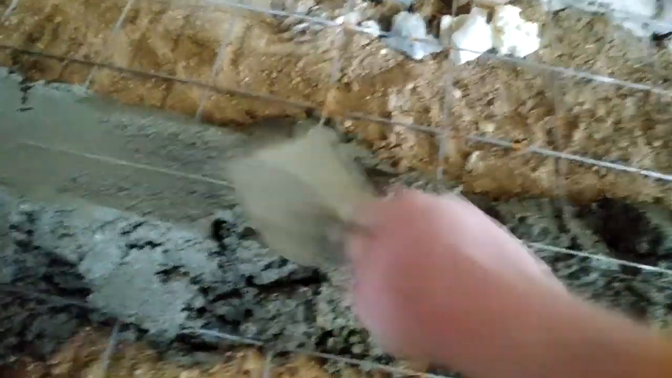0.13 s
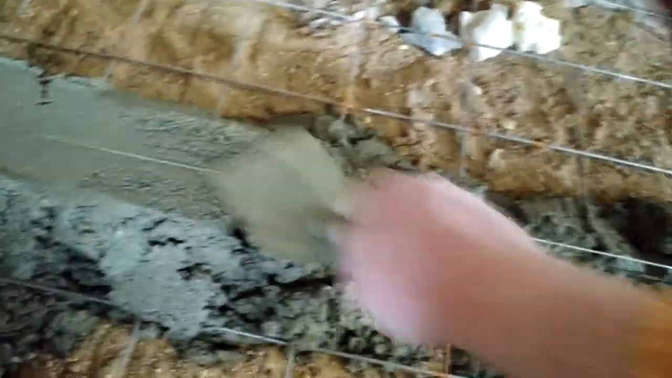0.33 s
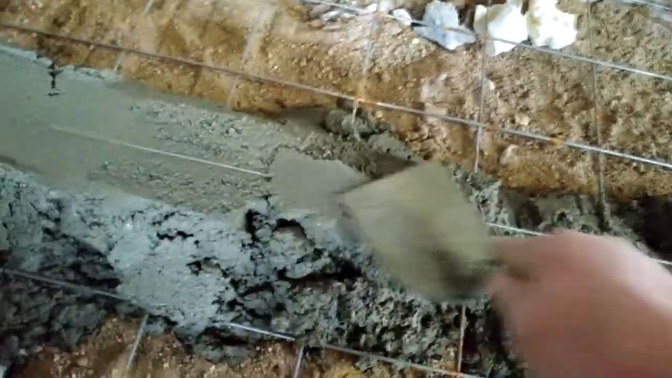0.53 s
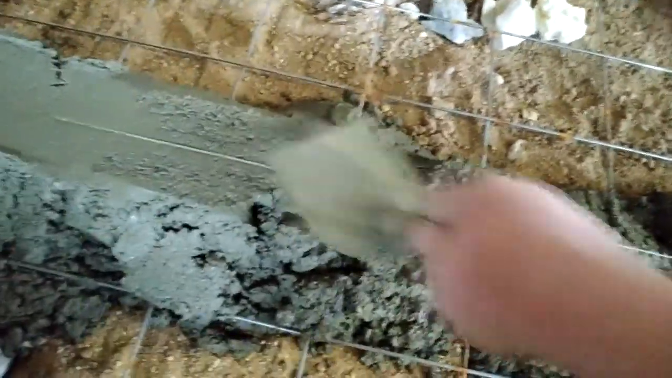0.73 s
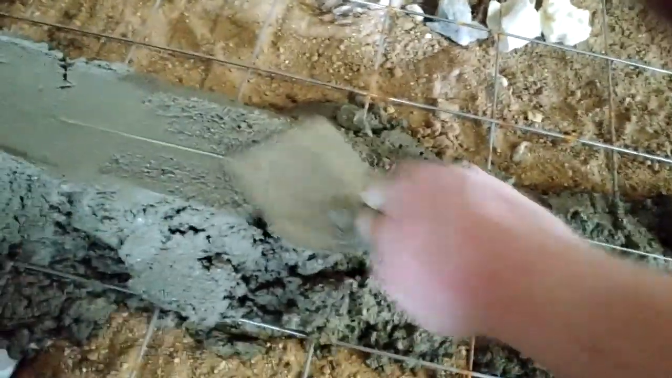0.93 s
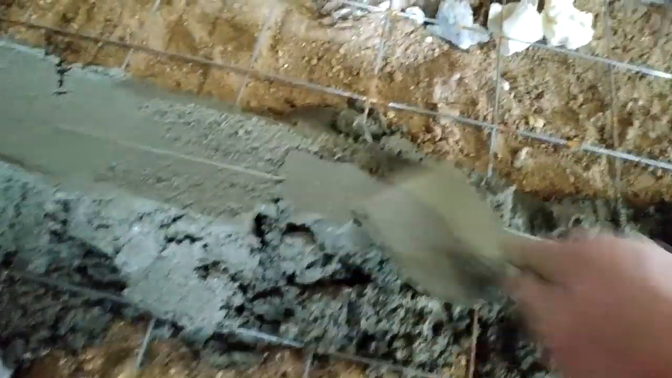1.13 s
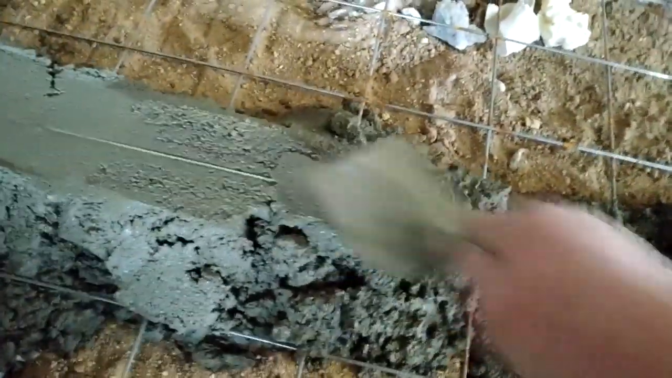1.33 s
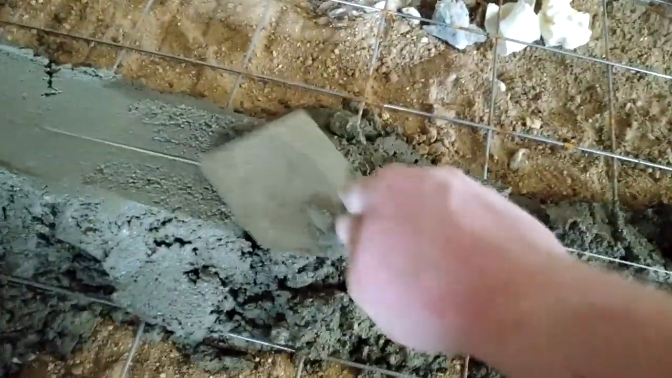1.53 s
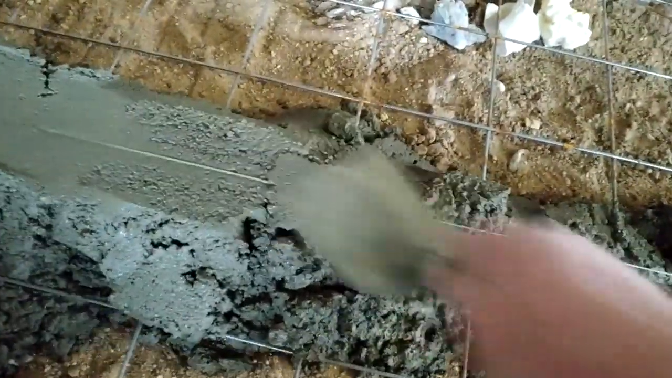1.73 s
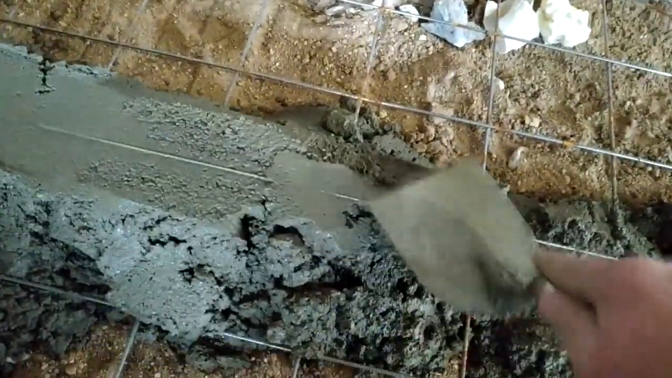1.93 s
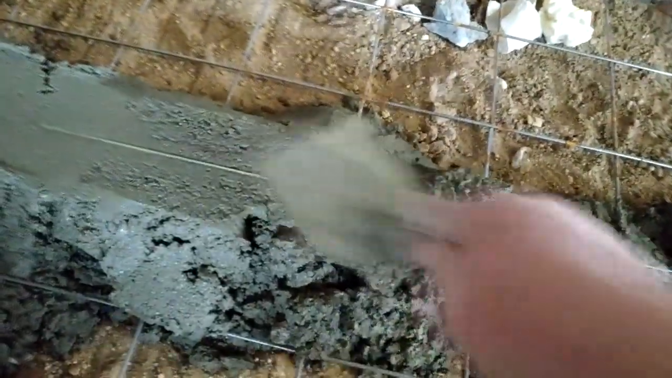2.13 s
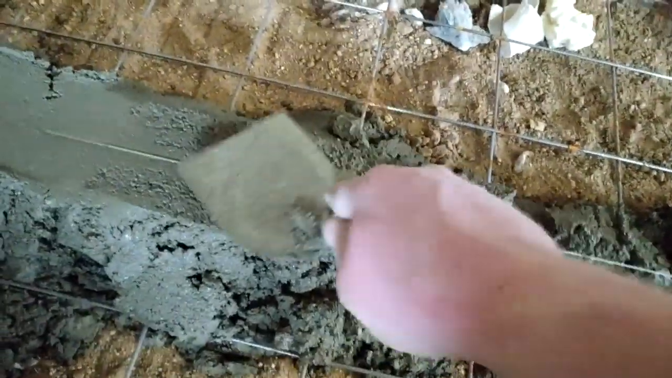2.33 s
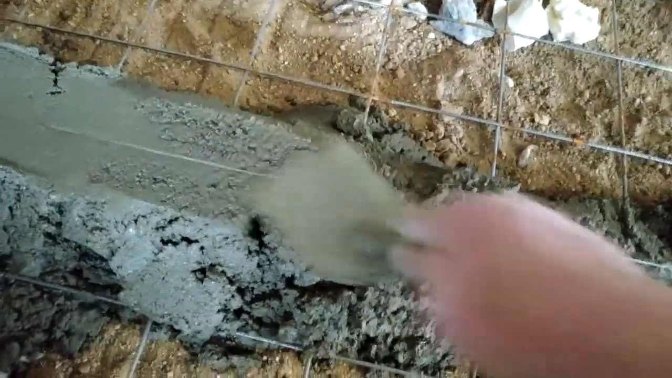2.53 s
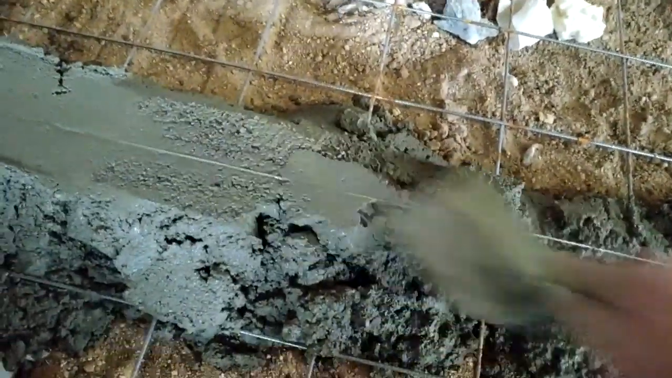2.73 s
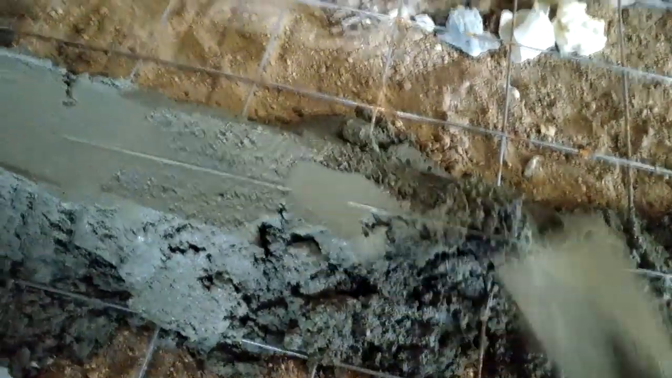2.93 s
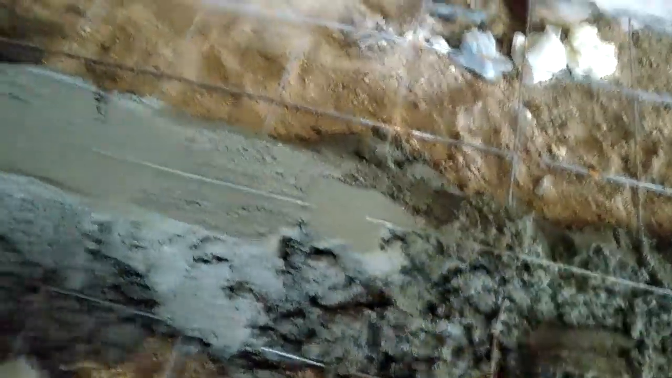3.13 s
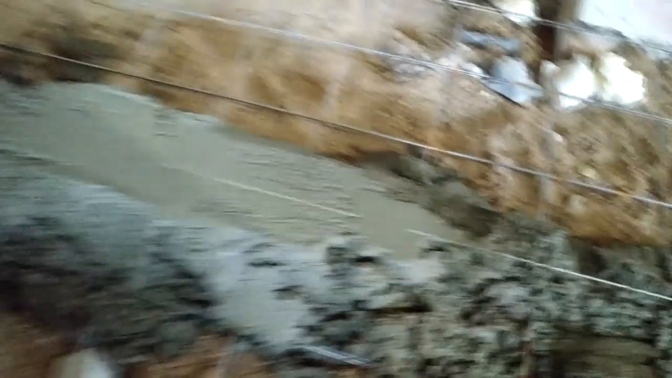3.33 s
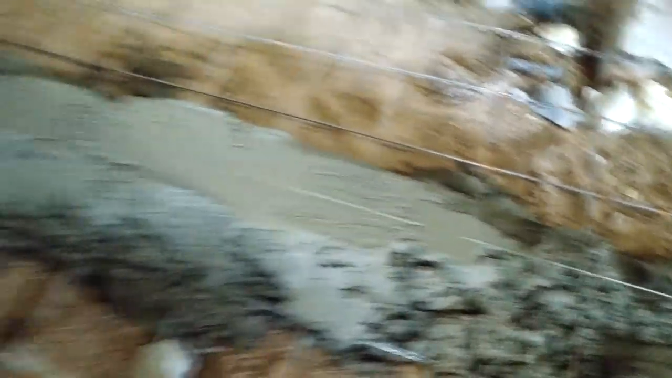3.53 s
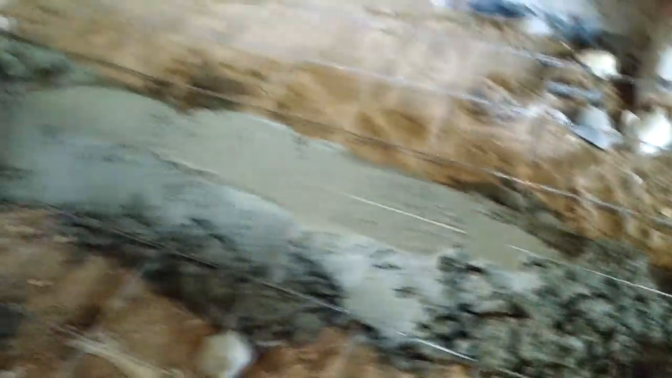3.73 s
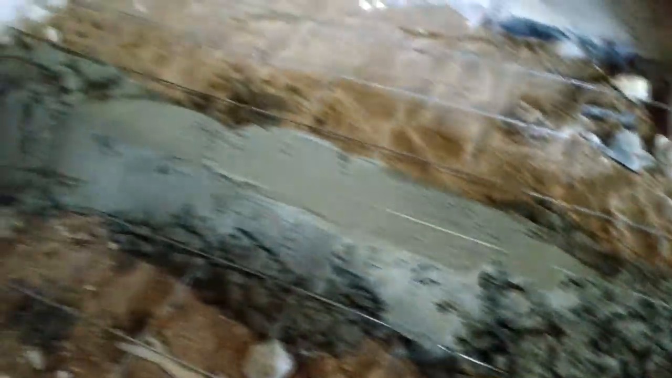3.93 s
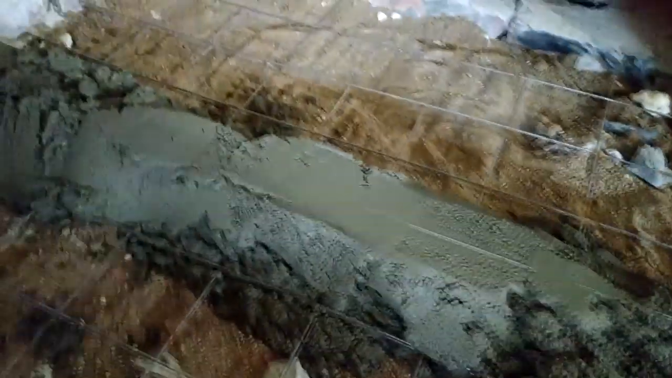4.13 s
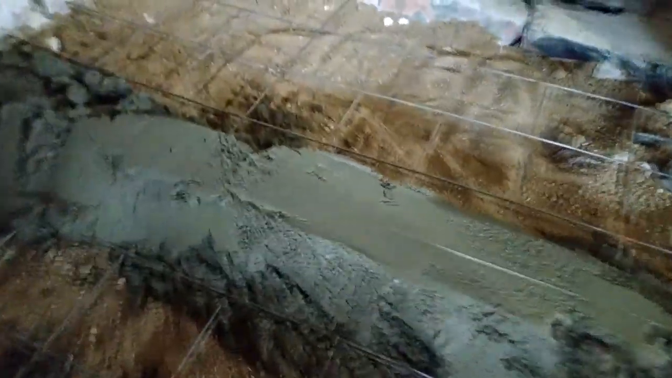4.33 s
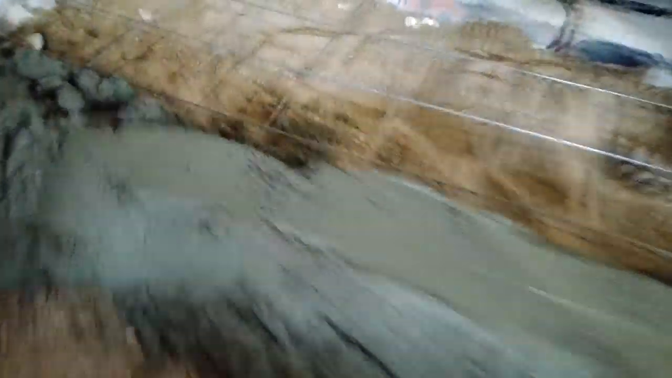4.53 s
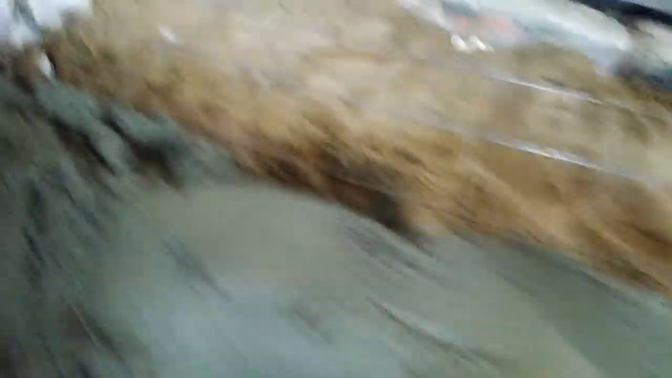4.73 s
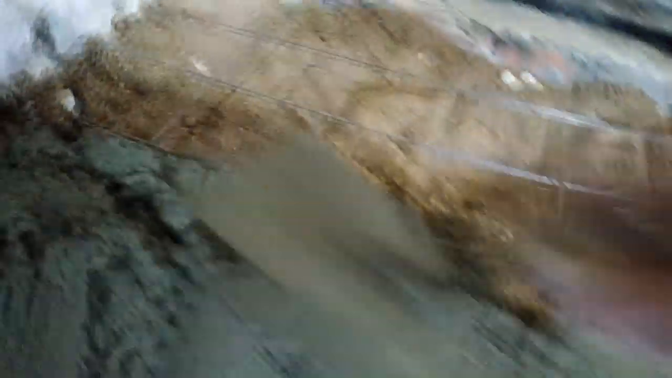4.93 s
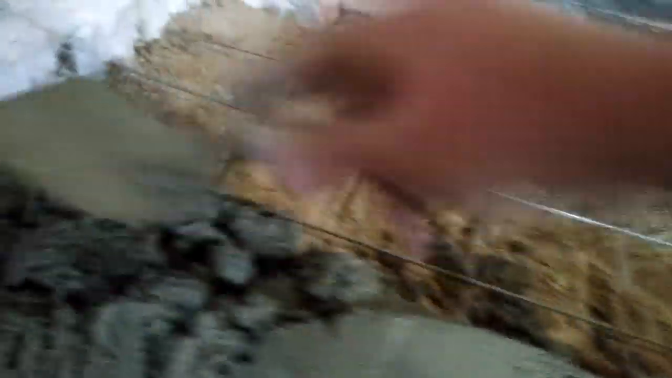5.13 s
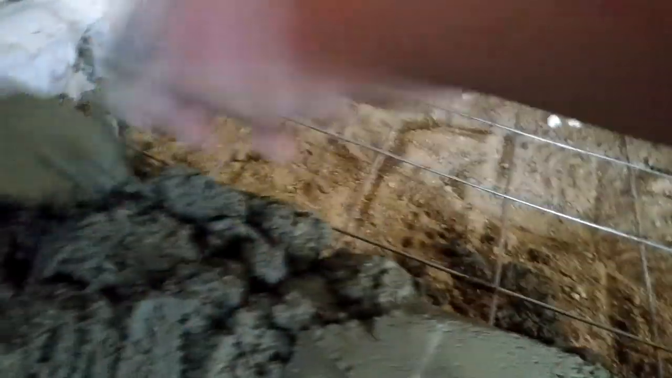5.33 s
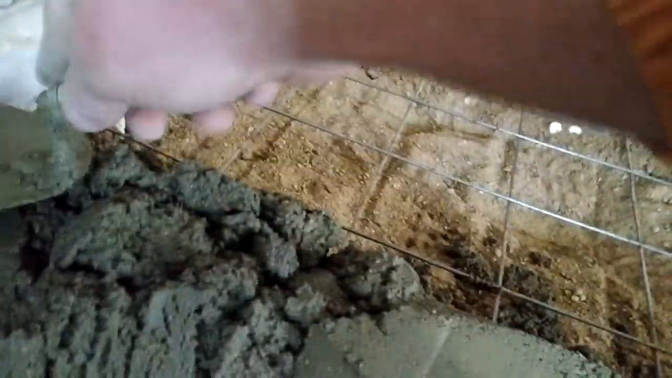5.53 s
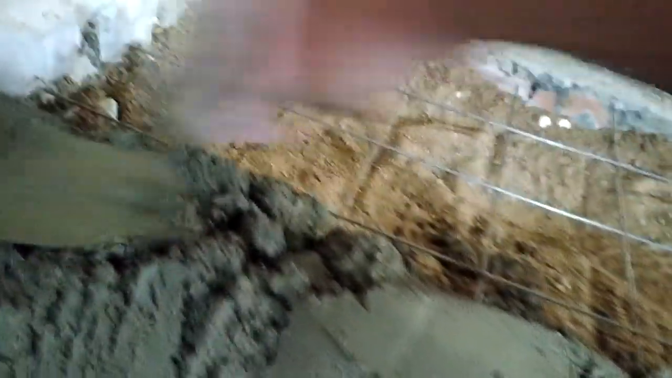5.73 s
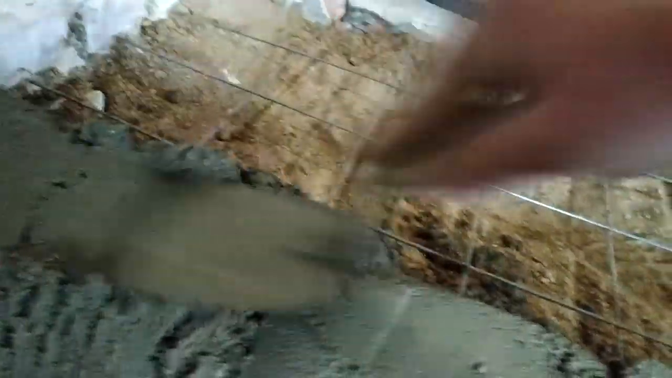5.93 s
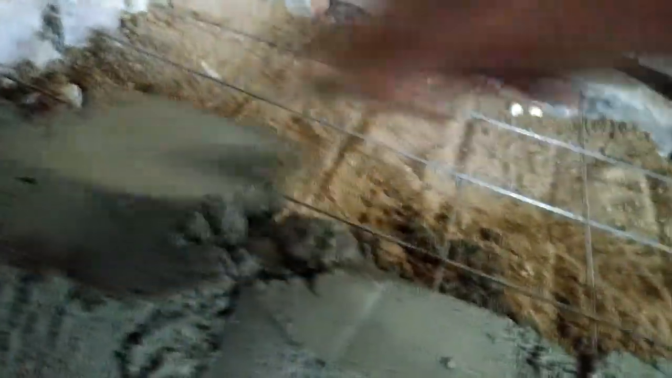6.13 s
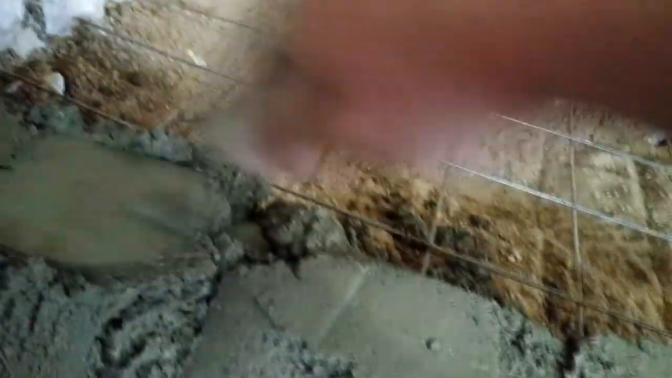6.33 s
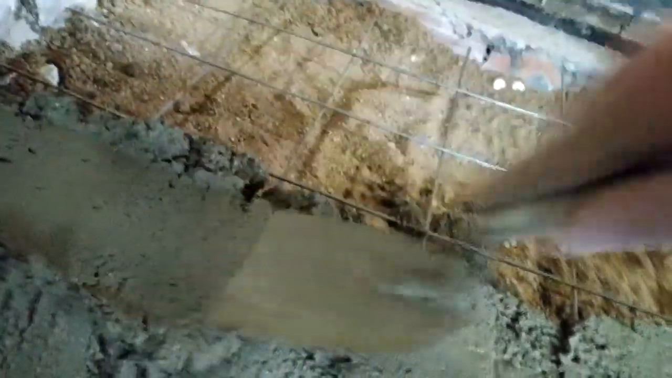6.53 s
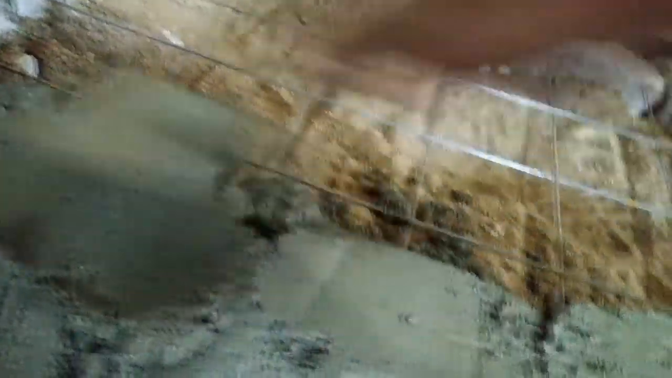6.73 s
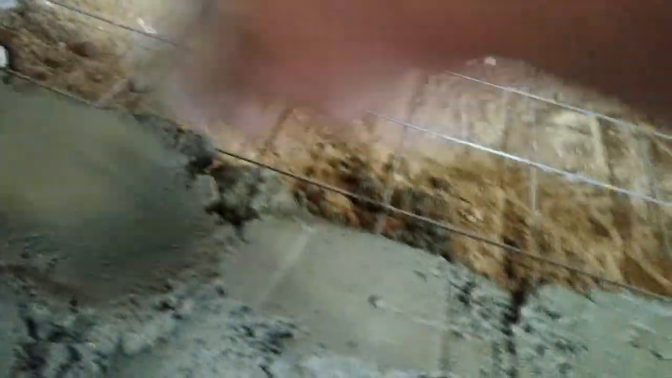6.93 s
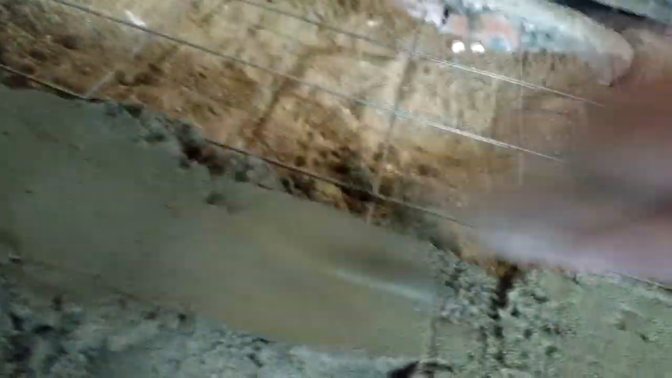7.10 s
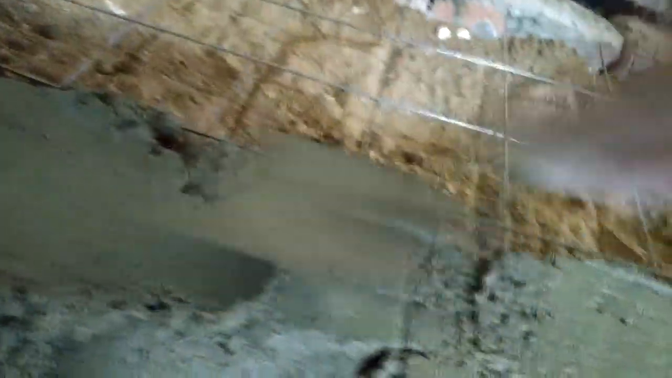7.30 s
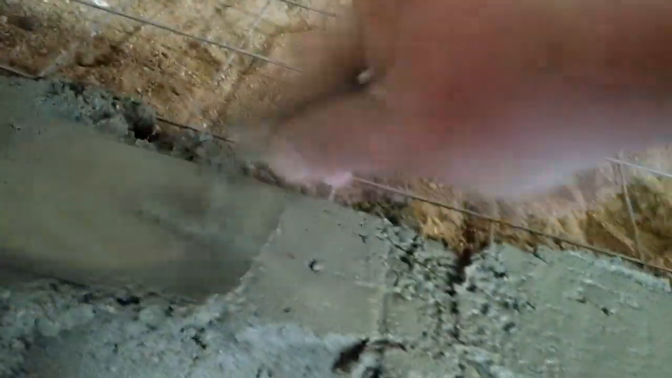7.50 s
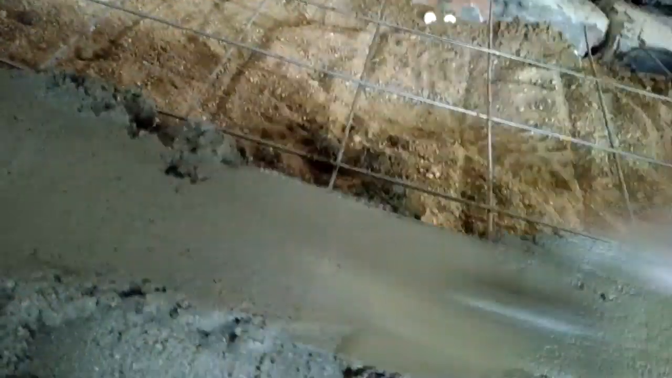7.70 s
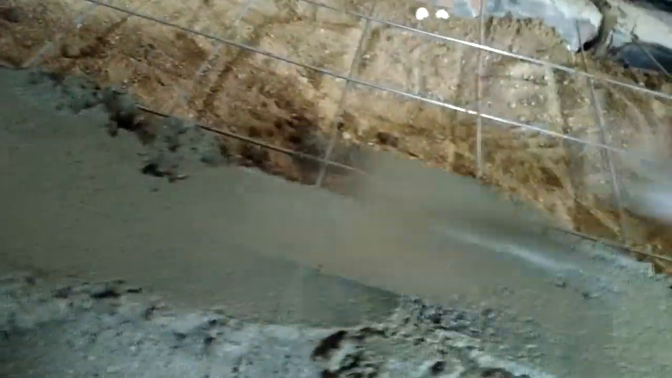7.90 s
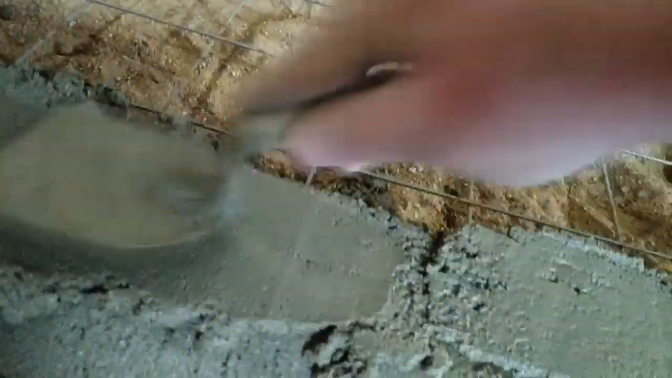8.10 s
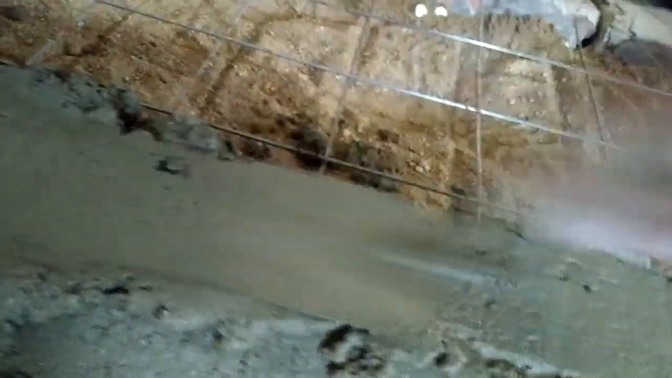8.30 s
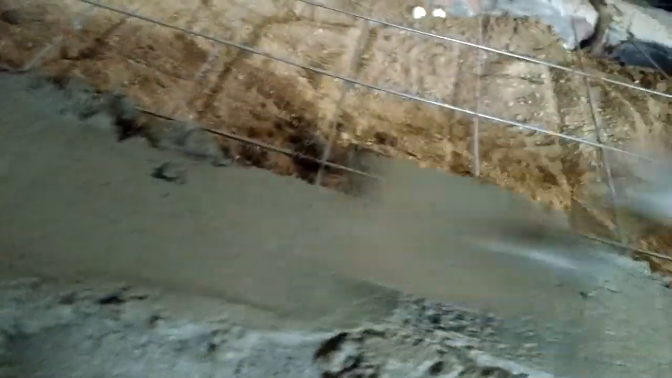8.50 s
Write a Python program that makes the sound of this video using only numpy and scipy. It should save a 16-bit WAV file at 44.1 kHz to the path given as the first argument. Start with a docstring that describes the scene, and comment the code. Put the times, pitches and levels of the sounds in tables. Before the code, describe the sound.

Gritty, chattering trowel scrapes on cement indoors, then shuffling knocks as the rumble fades, and five soft, even hissing passes in near quiet.

```python
"""A dull background rumble comes first; then a steel trowel smooths a strip of cement screed on a floor indoors.
Four firm strokes, some in several pushes, grind on sandy mortar and make the blade chatter.
The worker shifts along with rustles and bumps; the background dies down and five lighter strokes
hiss over wetter mortar. Random grain slips feed every scrape and rustle; resonances make the steel
and the knocks, and filtered noise makes the background."""
import sys
import numpy as np
from scipy import signal
from scipy.fft import rfft, irfft, next_fast_len
from scipy.io import wavfile
from scipy.ndimage import map_coordinates

SR = 44100
rng = np.random.default_rng(int(sys.argv[2]) if len(sys.argv) > 2 else 0)


def int16_out(signal):
    """Quantize to a 16-bit WAV file."""
    q = np.round(np.clip(np.atleast_2d(signal).T, -1, 1) * 32767)
    wavfile.write(sys.argv[1], SR, q.astype(np.int16))


N = 377496
TIME = np.arange(N) / SR   # seconds

# Firm pushes on sandy mortar. Each row: start in seconds, length in seconds, attack in seconds,
# landing in dB, sand hiss in dB, rise of the hiss over the push in dB, edge ring in dB,
# blade chatter in dB, edge pitch at the start in Hz (before its wobble).
FIRM_PUSHES = [(0.31, .18, 0.042, -32.5, -24.5, -2.5, -35, -36, 4580),
               (0.856, 0.024, 0.0077, -45.5, -32.5, -2, -34.5, -47.5, 3630),
               (0.885, 0.19, 0.0073, -44, -28, 5.5, -43, -40.5, 4860),
               (1.094, 0.022, 0.0089, -51.5, -29.5, 3, -37.5, -33, 3200),
               (1.583, 0.089, 0.001, -31, -25.5, -1, -34.5, -47.5, 4280),
               (1.674, 0.16, 0.0099, -63, -28, 2, -39, -35, 4040),
               (2.41, 0.11, 0.0016, -21.5, -27, 0.5, -32.5, -36, 4400),
               (2.512, 0.12, 0.0087, -58, -29.5, 3.5, -39.5, -36, 3500),
               (2.633, 0.091, 0.021, -59.5, -23.5, 4, -51, -35.5, 3600)]
# Light passes on wet mortar. Each row: start in seconds, length in seconds, attack in seconds,
# landing in dB, sand hiss in dB, rise of the hiss over the pass in dB, paste smear in dB,
# lift-off in dB per second, swish in dB, swish pitch at the start in Hz (before its wobble).
LIGHT_PASSES = [(5.522, 0.13, 0.03, -90, -39.5, 10.5, -51.5, 324, -50, 4330),
                (5.674, 0.28, 0.029, -75, -40, 3.5, -49.5, 400, -74, 3020),
                (6.239, 0.27, 0.033, -51, -37.5, 3, -50.5, 753, -56.5, 3830),
                (6.828, 0.099, .002, -54.5, -48, 17, -61, 498, -70, 3000),
                (6.883, 0.27, 0.013, -70, -37.5, 2, -53, 752, -54, 4060),
                (7.485, .26, 0.019, -36, -36, 0.5, -52.5, 649, -57, 3930),
                (8.097, 0.27, 0.061, -58, -34.5, -5.5, -54, 704, -64.5, 3300)]
# Spectrum of wet sand. Each row: frequency in Hz, relative level in dB per Hz.
WET_SAND = [(100, -56), (600, -32), (1200, -22), (1800, -16.5), (2700, -10), (3600, -4.5), (4500, -2),
            (6000, -2), (8000, 0), (11000, 2), (16000, 2)]


def from_db(db):
    """Decibels to gain."""
    return 10 ** (np.asarray(db) / 20)


def rms_one(x):
    """Scale to an average strength (rms) of 1."""
    return x / np.sqrt(np.mean(x ** 2) + 1e-20)


def at_hz(points, hz):
    """Read a table of (Hz, value) on a log-frequency axis."""
    f, value = np.transpose(points)
    return np.interp(np.log(hz + 1), np.log(f), value)


def drift(per_s):
    """Random wavering: fresh normal values (spread 1), per_s of them a second, joined by straight lines."""
    knots = rng.standard_normal(N // 8)
    return np.interp(TIME * per_s, np.arange(len(knots)), knots)


def add(track, s, sound):
    """Mix a short sound into a track at time s."""
    start = int(s * SR)
    track[..., start:start + sound.shape[-1]] += sound[..., :track.shape[-1] - start]


def colour(pair, spectrum):
    """Two unrelated signals become a stereo sound with this spectrum; the ears differ by pitch; rms 1."""
    # Left-right likeness. Each row: frequency in Hz, coherence from 0 (unrelated) to 1 (the same).
    likeness = [(60, 0.078), (140, .92), (290, 0.8), (550, 0.44), (1200, 0), (2200, 0.12), (4000, 0.076),
                (7000, 0.022), (15000, 0.06)]
    size = next_fast_len(N)
    hz = np.arange(size // 2 + 1) * SR / size
    mid, side = rfft(pair, size) * from_db(at_hz(spectrum, hz))
    alike = np.clip(at_hz(likeness, hz), -1, 1)
    shared = np.sqrt(1 + alike) * mid
    opposed = np.sqrt(1 - alike) * side * [[1], [-1]]
    return rms_one(irfft(shared + opposed, size)[:, :N])


def wander(x, depth_db, width_hz, per_s, size=512):
    """Narrow parts of the spectrum swell and fade on their own; rms 1."""
    hz, s, frames = signal.stft(x, SR, nperseg=size)
    where = np.meshgrid(hz / width_hz, s * per_s, indexing="ij")
    patches = map_coordinates(rng.standard_normal((size, size)), where, order=1, mode="wrap")
    changed = frames * from_db(depth_db * patches)
    return rms_one(signal.istft(changed, SR, nperseg=size)[1][:, :N])


def grains(per_s, size_db, clump_db):
    """Sand grains slip at random moments, with uneven sizes, in clumps of a few milliseconds."""
    slips = rng.random(N) < per_s / SR
    uneven = np.minimum(rng.exponential(1, N), 5)
    sizes = from_db(size_db * uneven + clump_db * drift(350))
    return slips * sizes * rng.standard_normal((2, N))


def resonate(x, modes):
    """Resonances side by side, each (Hz, width in Hz, dB), with alternating signs; rms 1."""
    out = 0
    for k, (hz, width, db) in enumerate(modes):
        r = np.exp(-np.pi * width / SR)
        top = (-1) ** k * from_db(db) * (1 - r * r) / 2
        out = out + signal.lfilter([top, 0, -top], [1, -2 * r * np.cos(2 * np.pi * hz / SR), r * r], x)
    return rms_one(out)


def decays(hits, rise_s, t60):
    """Gain of blows (start in s, dB) that swell quickly and die away by 60 dB in t60 seconds."""
    out, age = np.zeros(N + SR), TIME[:SR // 4]
    for s, db in hits:
        add(out, s, from_db(db - 60 * age / t60) * (1 - np.exp(-age / rise_s)))
    return out[:N]


def swell(s, swell_s, fade_s, shape=1.63):
    """Gain of a soft movement that is strongest at time s."""
    return np.exp(-np.maximum((s - TIME) / swell_s, (TIME - s) / fade_s) ** shape)


def stroke(start, length, attack_s, lift_db_per_s, arc, rise_db=0):
    """Gain of one stroke: the blade presses in, the pressure passes through an arc, the blade lifts off."""
    age = np.maximum(TIME - start, 0)
    share = np.minimum(age / length, 1)
    top, drop_db = arc   # strongest at this share of the stroke; drop in dB half a stroke away
    tilt_db = rise_db * (share - .5)
    arc_db = -drop_db * (2 * (share - top)) ** 2
    lift_db = -lift_db_per_s * np.clip(age - length, 0, .5)
    return (1 - np.exp(-age / attack_s)) * from_db(tilt_db + arc_db + lift_db)


def sagging(x, strokes, oct_per_s, width_hz, wobble_oct, size=128):
    """A steep resonance starts near each stroke's pitch and falls unevenly as the blade flattens; rms 1."""
    start, length, *_, pitch = np.transpose(strokes)
    out, state = np.zeros((2, N)), np.zeros((2, 4))
    r = np.exp(-np.pi * width_hz / SR)
    wobble = wobble_oct * drift(40)   # uneven pressure bends the pitch
    for i in range(0, N, size):
        k = max(np.searchsorted(start, i / SR) - 1, 0)   # the latest stroke
        fall_oct = oct_per_s * np.clip(i / SR - start[k], 0, length[k])
        hz = pitch[k] * 2 ** (wobble[i] - fall_oct)
        poles = [1, -2 * r * np.cos(2 * np.pi * hz / SR), r * r]
        block = x[:, i:i + size]
        # the same resonance twice over, which makes it steep
        out[:, i:i + size], state = signal.lfilter([1, 0, -2, 0, 1], np.convolve(poles, poles), block, zi=state)
    return rms_one(out)


def background():
    """A dull, slightly wavering noise rumble dies down halfway through and leaves a faint room tone."""
    # Rumble level before the overall lift. Each row: time in seconds, level in dB.
    rumble_level = [(0.0, -54), (0.78, -54.5), (1.17, -51), (2.12, -51), (2.38, -46.5), (3.101, -54),
                    (3.45, -52.5), (3.93, -50.5), (4.29, -54.5), (4.65, -50), (4.86, -55), (5.007, -61),
                    (5.13, -75), (6.0, -79.5), (8.56, -84.5)]
    # Spectra of rumble and room tone. Each row: frequency in Hz, relative level in dB per Hz.
    rumble_spectrum = [(18, -81), (30, -46.5), (106, -34), (161, -8), (252, 0.5), (328, -7.5), (426, -6.5),
                       (554, -9), (684, -7.5), (1810, -11), (3060, -20.5), (5900, -22), (9970, -26.5),
                       (14800, -24.5), (16000, -30)]
    tone_spectrum = [(30, -56), (105, -31), (150, -12), (220, -3.5), (300, -9.5), (444, -6.5), (600, -9.5),
                     (1240, -13), (3470, -22.5), (15000, -25.5)]
    lift_db, tone_db = 4.5, -70.5
    s, db = np.transpose(rumble_level)
    rumble = colour(rng.standard_normal((2, N)), rumble_spectrum)
    rumble = wander(rumble, depth_db=3.5, width_hz=181, per_s=18)
    tone = colour(rng.standard_normal((2, N)), tone_spectrum)
    tone = wander(tone, depth_db=2.5, width_hz=200, per_s=12)
    rumble_gain = from_db(np.interp(TIME, s, db) + lift_db)
    return rumble_gain * rumble * from_db([[-.3], [.3]]) + from_db(tone_db) * tone


def shifting():
    """Grains scuff and rustle as the worker moves, and loose mortar is brushed aside."""
    # The worker shifts about. Each row: strongest at this second, swell in seconds, fade in seconds,
    # dull scuff in dB, rustle in dB.
    shift_moves = [(1.945, 0.039, 0.18, -60, -42.5), (2.171, 0.045, 0.3, -44, -40),
                   (2.305, 0.027, 0.088, -53, -33), (2.78, 0.03, 0.36, -68, -53.5),
                   (2.995, 0.025, 0.1, -51, -49), (3.365, .015, 0.018, -47.5, -48.5),
                   (3.715, 0.037, 0.028, -40.5, -42), (3.83, 0.048, 0.076, -37.5, -34.5),
                   (3.938, 0.019, 0.04, -40, -37), (4.04, 0.091, 0.19, -48, -47),
                   (4.21, 0.062, 0.037, -48.5, -53), (4.56, 0.16, 0.12, -60, -53.5),
                   (4.8, 0.18, 0.23, -62, -51)]
    # Mortar brushed aside. Each row: strongest at this second, swell in seconds, fade in seconds, level in dB.
    brush_moves = [(5.19, 0.067, 0.22, -71), (5.385, 0.028, 0.039, -60.5), (5.459, 0.012, 0.076, -56),
                   (5.605, 0.054, 0.035, -52.5), (6.021, 0.059, 0.21, -65.5), (8.495, 0.025, 0.076, -67.5)]
    # Where the worker moves about. Each row: time in seconds, left minus right in dB.
    place = [(3.0, 1), (3.85, -3), (4.6, 2.5), (5.0, 2.5)]
    # Spectra of scuffs, rustles and crumbs. Each row: frequency in Hz, relative level in dB per Hz.
    scuff_spectrum = [(71, -50.5), (120, -33), (183, -14), (375, 2), (618, -10.5), (898, -0.5), (1100, -2),
                      (1270, 2.5), (1550, -6), (2400, -3.5), (5000, -15.5), (6500, -54.5), (11000, -120)]
    rustle_spectrum = [(200, -45.5), (1000, -27.5), (2500, 1), (4000, 1.5), (5200, 0.5), (7000, 2.5),
                       (9000, 1.5), (12000, 2.5), (16000, 2.5)]
    crumb_spectrum = [(100, -38), (350, -8), (600, -2.5), (1200, -4.5), (2000, 0.5), (3000, 1),
                      (4500, -5.5), (7000, -5.5), (16000, -5)]
    scuff = rustle = brush = 0
    for *timing, scuff_db, rustle_db in shift_moves:
        move = swell(*timing)
        scuff = scuff + from_db(scuff_db) * move
        rustle = rustle + from_db(rustle_db) * move
    for *timing, db in brush_moves:
        brush = brush + from_db(db) * swell(*timing)
    heavy = grains(per_s=6000, size_db=1.7, clump_db=1.2)
    fine = grains(per_s=14000, size_db=2.0, clump_db=1.2)
    dull = wander(colour(heavy, scuff_spectrum), depth_db=1.0, width_hz=210, per_s=26)
    bright = wander(colour(fine, rustle_spectrum), depth_db=3.5, width_hz=170, per_s=20)
    crumbs = colour(fine, crumb_spectrum)
    pan_db = np.interp(TIME, *np.transpose(place)) * [[.5], [-.5]]
    return (scuff * dull + rustle * bright + brush * crumbs) * from_db(pan_db)


def bumps(swell_s=0.0031, apart=1.0):
    """Each bump is a soft thud with a solid knock; grit crumbles under it and again as it rebounds."""
    # Dull bumps. Each row: start in seconds, thud in dB, thud pitch in Hz, thud fade by 60 dB in seconds,
    # knock peak in dB (before the bass cut), knock pitch in Hz.
    bump_list = [(2.545, -24.5, 220, 0.091, -32, 800), (3.024, -34, 264, 0.023, -42, 800),
                 (3.362, -35, 392, 0.018, -38, 900), (3.69, -30, 320, 0.037, -52, 804),
                 (3.712, -30.5, 258, 0.045, -19, 872), (3.819, -40, 300, 0.03, -27, 1290),
                 (3.942, -49, 367, 0.026, -26, 990), (4.606, -34, 288.6, 0.13, -23.5, 1470),
                 (4.612, -34, 300, 0.063, -33.5, 830), (4.637, -39, 260, 0.032, -54, 830),
                 (5.06, -45.5, 213, 0.025, -54, 700), (5.613, -54, 300, 0.08, -36, 993),
                 (6.9, -52, 380, 0.03, -50.5, 586)]
    # Resonances of a knock. Each row: multiple of its pitch, width as a share of the pitch, level in dB.
    knock_modes = [(1, 0.14, 4), (1.52, 0.093, 0.5), (2.7, 0.5, -10)]
    crumble_t60_s, rebound_s, rebound_db = 0.019, 0.015, -13.5   # the rebound is a second, weaker contact
    grit_db = -8.5   # grit against the blow
    half_blow_s, left_lag_s = 0.00009, 0.00016   # half the blow's length; delay to the left ear
    dull_above = 2.4   # a knock is dull above this multiple of its pitch

    out, age = np.zeros((2, N)), TIME[:SR // 4]
    contact = from_db(-60 * age / crumble_t60_s)
    contact = contact + from_db(rebound_db) * np.interp(age - rebound_s, age, contact, left=0)
    blow = np.maximum(1 - np.abs((age - [[left_lag_s], [0]]) / half_blow_s - 1), 0)
    for s, thud_db, thud_hz, thud_t60, knock_db, knock_hz in bump_list:
        push = np.minimum(age / swell_s, 1) ** 2 * from_db(-60 * np.maximum(age - swell_s, 0) / thud_t60)
        thud = np.sin(2 * np.pi * thud_hz * age) * push
        grit = rng.standard_normal(len(age)) + apart * rng.standard_normal((2, len(age)))
        modes = np.array(knock_modes) * [knock_hz, knock_hz, 1]
        knock = resonate(blow + from_db(grit_db) * grit * contact, modes)
        knock = signal.sosfilt(signal.butter(2, dull_above * knock_hz, fs=SR, output="sos"), knock)
        add(out, s, from_db(thud_db) * thud + from_db(knock_db) * knock / np.abs(knock).max())
    # the bass below about 160 Hz is cut away
    return signal.sosfilt(signal.butter(6, 160, "high", fs=SR, output="sos"), out)


def snaps(crack_db=-23):
    """Grit cracks drily: a short burst of fading noise through one resonance, plus a little plain noise."""
    # Dry clicks of grit. Each row: start in seconds, relative level in dB, centre in Hz, width in Hz,
    # fade by 60 dB in seconds.
    clicks = [(1.586, -19, 2920, 900, 0.027), (2.418, -15, 7100, 4000, 0.024),
              (2.447, -20, 4300, 1200, 0.03), (3.095, -39, 3000, 900, 0.05),
              (3.176, -30, 9000, 4970, 0.008), (3.767, -23, 1190, 200, 0.033),
              (3.808, -24.5, 1270, 400, 0.026), (3.820, -25, 2600, 1600, 0.02),
              (3.94, -28, 2350, 790, 0.026), (4.607, -24.5, 2200, 596, 0.014),
              (5.451, -33, 3530, 3180, 0.027), (5.612, -37, 1890, 700, 0.026),
              (5.624, -39, 1700, 900, 0.026), (6.242, -45, 6000, 5000, 0.02),
              (7.4878, -40, 4820, 1980, 0.029), (8.1177, -36, 9000, 3500, 0.026)]
    out, age = np.zeros((2, N)), TIME[:SR // 16]
    for s, db, hz, width_hz, t60 in clicks:
        shared, left, right = rng.standard_normal((3, len(age)))
        noise = (shared + np.array([left, right])) / np.sqrt(2)
        crack = resonate(noise, [(hz, width_hz, 0)]) + from_db(crack_db) * noise
        add(out, s, from_db(db - 60 * age / t60) * crack / 2)
    return signal.sosfilt(signal.butter(2, 500, "high", fs=SR, output="sos"), out)


def touches():
    """Every push or pass starts with a crunch as the steel lands on the grit and its edge rings briefly."""
    # Resonances of the blade's edge. Each row: frequency in Hz, width in Hz, level in dB.
    edge_modes = [(2956, 70, 4.5), (3210, 170, 2.5), (3860, 130, 0.5), (4500, 470, -0.5), (5500, 150, -7.5)]
    ring_db = -21   # ring against the crunch
    grit = colour(grains(per_s=24000, size_db=1.2, clump_db=.8), WET_SAND)
    landings = [(start, db) for start, _, _, db, *_ in FIRM_PUSHES + LIGHT_PASSES]
    crunch = decays(landings, rise_s=0.00055, t60=0.25) * grit
    ring = decays(landings, rise_s=.0004, t60=0.017) * resonate(grit, edge_modes)
    return crunch + from_db(ring_db) * ring


def light_strokes():
    """Wet mortar hisses finely and evenly; the paste smears under the damped blade with a falling swish."""
    # Spectrum of smeared paste. Each row: frequency in Hz, relative level in dB per Hz.
    paste_spectrum = [(150, -50), (400, -34.5), (800, -13.5), (1200, -6), (1550, -5), (1950, 1), (2550, -2),
                      (3200, -9), (4500, -5), (7000, -3), (12000, -26)]
    # arcs: strongest at this share of the pass, drop in dB half a pass away
    sand_arc, paste_arc, swish_arc = (0.29, 2.7), (0.63, 3.8), (0.41, 3.4)
    hiss = smear = swish = 0
    for start, length, attack_s, _, hiss_db, rise_db, smear_db, lift_db_per_s, swish_db, _ in LIGHT_PASSES:
        sweep = start, length, attack_s, lift_db_per_s
        hiss = hiss + from_db(hiss_db) * stroke(*sweep, sand_arc, rise_db)
        smear = smear + from_db(smear_db) * stroke(*sweep, paste_arc)
        swish = swish + from_db(swish_db) * stroke(*sweep, swish_arc)
    fine = grains(per_s=32000, size_db=1.5, clump_db=.7)
    sticky = grains(per_s=9000, size_db=1.6, clump_db=1.2)
    sand = wander(colour(fine, WET_SAND), depth_db=6.0, width_hz=110, per_s=30)
    paste = wander(colour(sticky, paste_spectrum), depth_db=6.0, width_hz=143.6, per_s=28)
    slurry = sagging(sticky, LIGHT_PASSES, oct_per_s=2.5, width_hz=1000, wobble_oct=0.1)
    return (hiss * sand + smear * paste + swish * slurry) * from_db([[-.2], [.2]])


def firm_strokes():
    """Sand grinds and cracks; the edge rings as it bites and sinks in pitch, the flattening blade chatters."""
    # The blade catches on a coarse grain. Each row: start in seconds, chatter in dB, crunch in dB.
    catches = [(0.397, -21, -30.5), (1.109, -20, -39), (1.009, -46.5, -25.5), (1.754, -18.5, -18.5),
               (1.796, -45, -21.5), (2.587, -24, -43), (2.606, -36, -20.5), (2.693, -32.5, -36),
               (2.718, -27.5, -38), (2.741, -25.5, -36), (6.916, -52, -53), (7.67, -50, -40.5),
               (8.245, -70, -45)]
    # Resonances of the bending blade. Each row: frequency in Hz, width in Hz, level in dB.
    flex_modes = [(490, 66, -7.5), (1045, 33, -1), (1174, 36, 1), (1288, 100, -3.5), (1498, 350, -12),
                  (2360, 150, -15.5)]
    # Spectra of sand and of a catch's crunch. Each row: frequency in Hz, relative level in dB per Hz.
    sand_spectrum = [(100, -56), (300, -29.5), (600, -15.5), (1000, -10), (1500, -5.5), (2050, -4.5),
                     (2600, -4.5), (4200, -0.5), (5600, -5), (7000, -2), (8500, -3), (10500, 1.5),
                     (12500, 1), (14300, 1.5), (16000, -6)]
    crunch_spectrum = [(500, -30.5), (1200, -5), (2300, 4.5), (3300, 0), (5000, -10), (12000, -16)]
    # arcs: strongest at this share of the push, drop in dB half a push away
    sand_arc, edge_arc, flex_arc = (0.24, 0.76), (.48, 4.5), (1, 3.4)
    lift_db_per_s = 654   # fade as the blade lifts off
    catch_rise_s, catch_t60_s = 0.0039, 0.059
    pebble_db = -12   # against the sand hiss

    hiss = edge = flex = 0
    for start, length, attack_s, _, hiss_db, rise_db, edge_db, flex_db, _ in FIRM_PUSHES:
        push = start, length, attack_s, lift_db_per_s
        hiss = hiss + from_db(hiss_db) * stroke(*push, sand_arc, rise_db)
        edge = edge + from_db(edge_db) * stroke(*push, edge_arc)
        flex = flex + from_db(flex_db) * stroke(*push, flex_arc)

    fine = grains(per_s=24000, size_db=1.9, clump_db=1.0)
    coarse = grains(per_s=9000, size_db=2.0, clump_db=1.4)
    sand = wander(colour(fine, sand_spectrum), depth_db=6.5, width_hz=140, per_s=24)
    # single coarse grains crack under a firm push
    pebbles = colour(grains(per_s=770, size_db=-0.5, clump_db=1.5), sand_spectrum)
    grind = hiss * (sand + from_db(pebble_db) * pebbles)

    drag = wander(colour(coarse, sand_spectrum), depth_db=6.0, width_hz=190.5, per_s=20)
    # the edge's ring falls as more steel meets the mortar
    ring = edge * sagging(drag, FIRM_PUSHES, oct_per_s=2.3, width_hz=1450, wobble_oct=0.13)

    bend = decays([(s, db) for s, db, _ in catches], catch_rise_s, catch_t60_s)
    crunch_gain = decays([(s, db) for s, _, db in catches], catch_rise_s, catch_t60_s)
    crunch = crunch_gain * colour(coarse, crunch_spectrum)
    # each ear also gets most of the other ear's drag, so the chatter is nearly the same in both
    blade = resonate(drag + 0.98 * drag[::-1], flex_modes)
    # a catch bends the blade slowly: only the low resonances answer
    low_blade = rms_one(signal.sosfilt(signal.butter(2, 1395, fs=SR, output="sos"), blade))
    chatter = flex * blade + bend * low_blade
    judder = from_db(0.6 * drift(45))   # the blade sticks and slips over coarse sand
    return (grind + judder * (ring + chatter) + crunch) * from_db([[-.6], [.6]])


def reflections(x, count=5):
    """Echoes off floor and wall; their paths change as the trowel moves, so their colour keeps shifting."""
    middle_delay_s, swing, swing_per_s = 0.003, 0.17, 7   # swing: typical change as a share of the delay
    out = np.zeros((2, N))
    for ear in range(2):
        for k, delay_s in enumerate(middle_delay_s * np.geomspace(.5, 2, count)):
            lag = SR * delay_s * np.exp(swing * drift(swing_per_s))
            out[ear] += (-1) ** k * x[ear, np.maximum(np.arange(N) - lag.astype(int), 0)]
    return out / np.sqrt(count)


def room(x, t60, delay_s, top_hz):
    """A diffuse tail of reflections from bare surfaces, different at each ear: fading, dulled noise."""
    age = TIME[:SR // 2]
    tail = rng.standard_normal((2, len(age))) * from_db(-60 * age / t60) * (age > delay_s)
    tail /= np.sqrt(np.sum(tail ** 2, axis=1)[:, None])
    tail = signal.sosfilt(signal.butter(1, top_hz, fs=SR, output="sos"), tail)
    return signal.fftconvolve(x, tail, axes=1)[:, :N]


def scene():
    """The trowel close by with its first reflections, the worker, the room's echo and the background."""
    near_share, room_db = .3, -8.5   # first reflections: share of the trowel's power; level of the echo
    trowel = firm_strokes() + light_strokes() + touches()
    near = reflections(trowel)
    work = np.sqrt(1 - near_share) * trowel + np.sqrt(near_share) * near
    work = work + snaps() + shifting() + bumps()
    echo = room(work, t60=0.18, delay_s=0.00043, top_hz=7000)
    return work + from_db(room_db) * echo + background()


def record(dry):
    """The treble is cut steeply above 16 kHz."""
    return signal.sosfilt(signal.ellip(12, .1, 75, 16000, fs=SR, output="sos"), dry)


dry = scene()
out = record(dry)
int16_out(out)
```